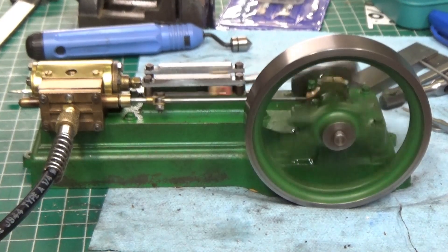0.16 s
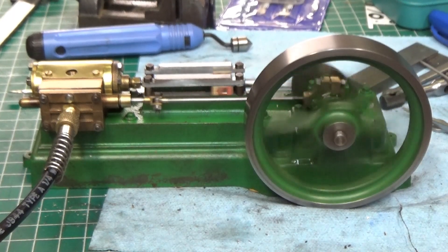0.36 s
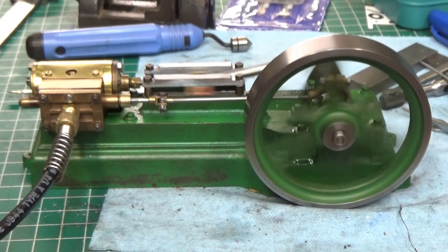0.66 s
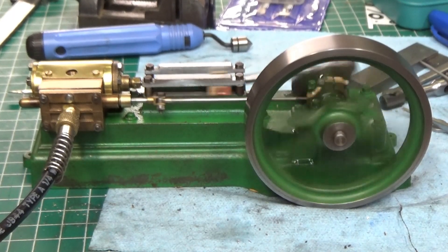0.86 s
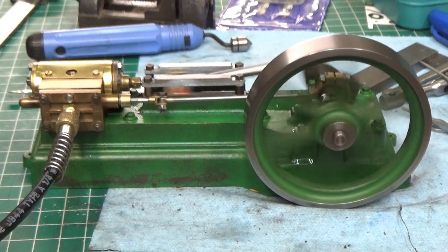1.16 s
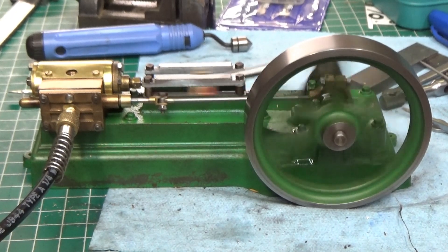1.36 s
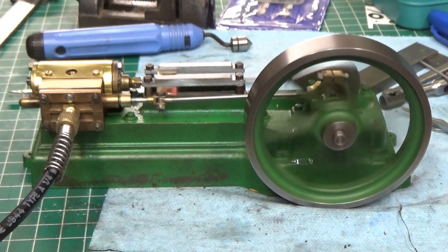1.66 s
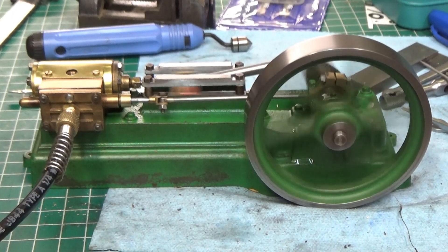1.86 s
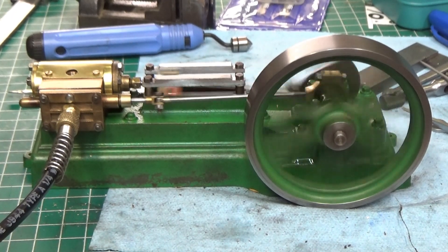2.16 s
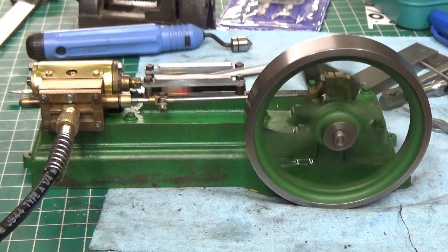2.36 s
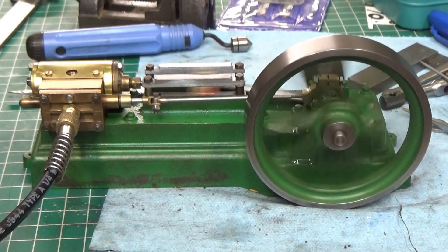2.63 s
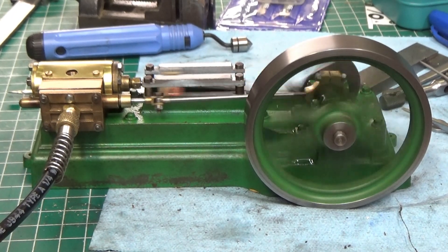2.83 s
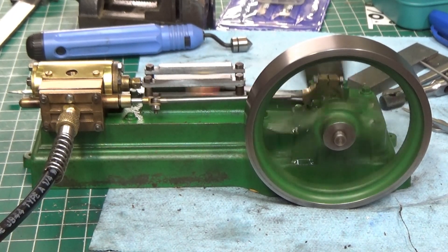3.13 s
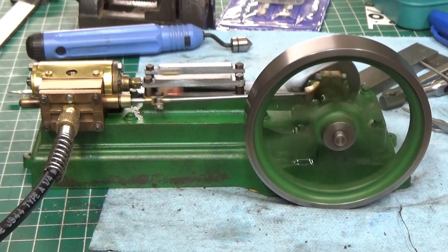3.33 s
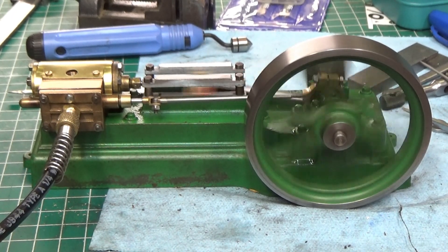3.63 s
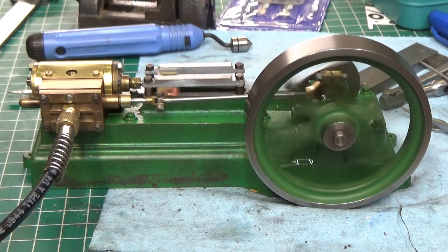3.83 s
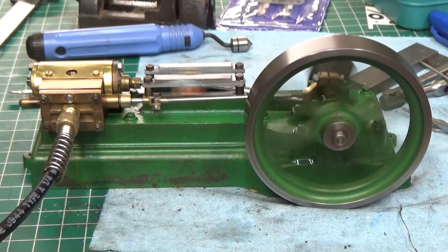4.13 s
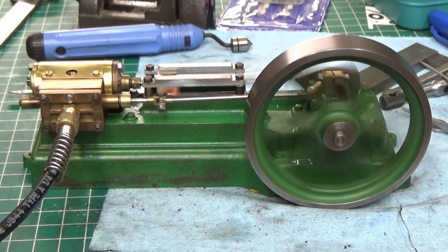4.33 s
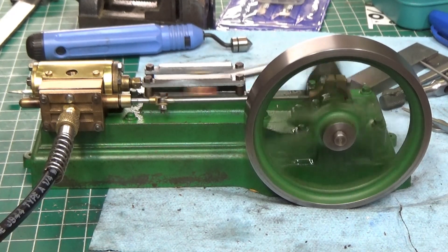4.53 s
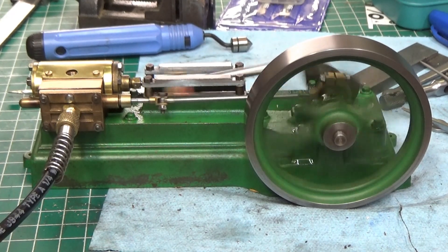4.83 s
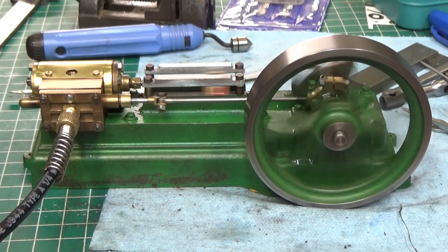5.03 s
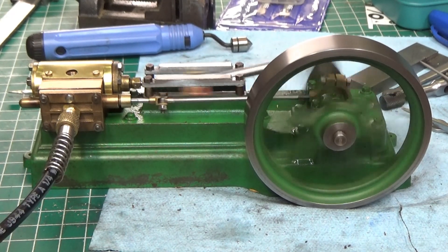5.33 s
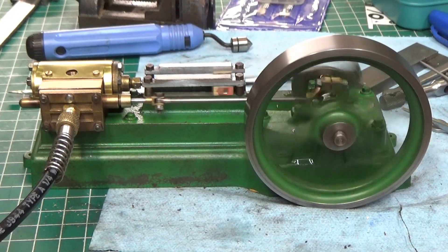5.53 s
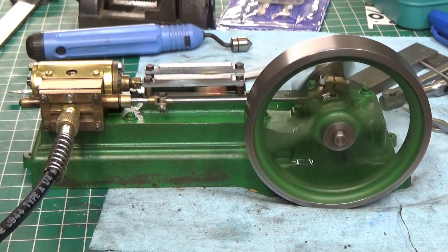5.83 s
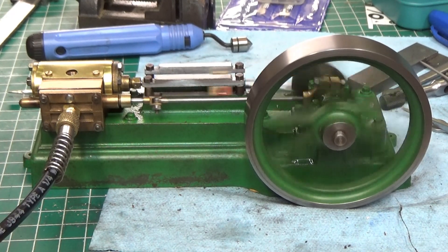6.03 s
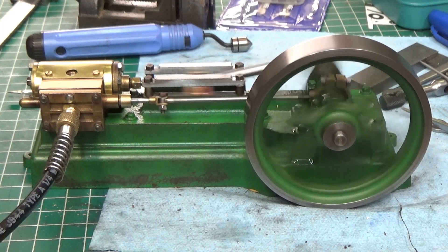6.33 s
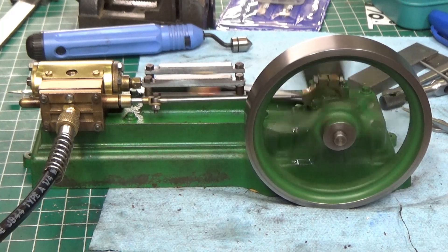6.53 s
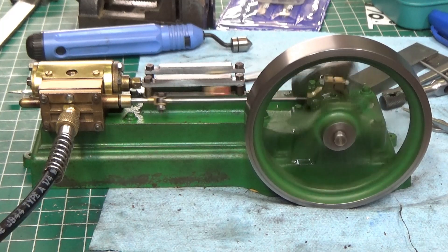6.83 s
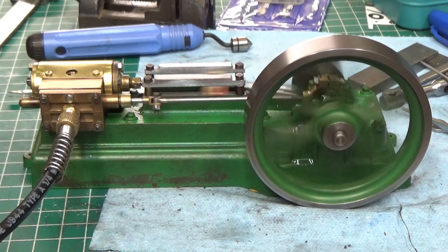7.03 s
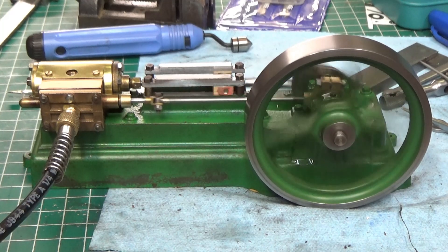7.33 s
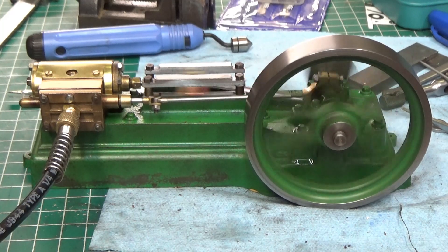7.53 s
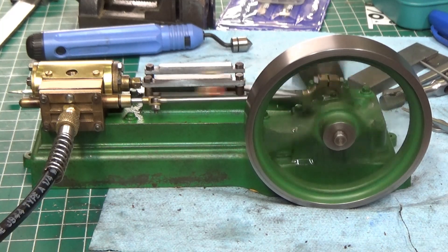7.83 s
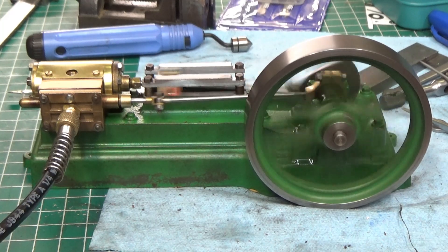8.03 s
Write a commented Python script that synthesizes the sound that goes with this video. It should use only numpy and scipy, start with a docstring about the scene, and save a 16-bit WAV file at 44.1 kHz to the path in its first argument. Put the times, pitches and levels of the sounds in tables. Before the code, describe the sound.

A small air-driven model steam engine chuffs fast and evenly with sharp hisses and light ticks, over a distant compressor's whine.

```python
"""A small horizontal model steam engine runs on compressed air on a workbench, close to a stereo pair.
From the first moment an air compressor whines further off, and something clunks twice on the bench.
Each turn lets out a sharp spit and two long hisses, with a weaker spit between them; the rod ticks at
both dead centres, the crosshead rumbles and a limiter rides on the hiss. Over eight seconds the
flywheel slowly gains speed, from about five and a half turns a second to just over six."""
import sys
import numpy as np
from scipy import signal
from scipy.fft import rfft, irfft, next_fast_len
from scipy.io import wavfile
from scipy.ndimage import uniform_filter1d

SR = 44100
rng = np.random.default_rng(int(sys.argv[2]) if len(sys.argv) > 2 else 0)


def unload_wav(signal):
    """Save mono or channel-first audio to the path in sys.argv[1] as 16-bit WAV at rate SR, clipped to [-1, 1]."""
    wavfile.write(
        sys.argv[1],
        SR,
        np.round(np.clip(np.atleast_2d(signal).T, -1, 1) * 32767).astype(np.int16),
    )


N = 361179
TIME = np.arange(N) / SR
FFT_SIZE = next_fast_len(N + SR)
FREQS = np.maximum(np.fft.rfftfreq(FFT_SIZE, 1 / SR), 1)


def from_db(db):
    """Decibels to gain."""
    return 10 ** (np.asarray(db) / 20)


def unit_rms(x):
    """Scale to unit power."""
    return x / np.sqrt(np.mean(x ** 2) + 1e-20)


def colour(points):
    """Gain at every frequency from (freq_hz, level_db) points."""
    hz, db = np.transpose(points)
    return from_db(np.interp(np.log(FREQS), np.log(hz), db))


def humps(rows):
    """Gain at every frequency from (centre_hz, width_hz, level_db) resonances."""
    return sum(from_db(db) * np.exp(-2 * ((FREQS - hz) / width) ** 2) for hz, width, db in rows)


def shaped(x, gain):
    """Filter by a gain per frequency."""
    return irfft(rfft(x, FFT_SIZE) * gain, FFT_SIZE)[..., :N]


def noise(gain):
    """Noise of the given colour, rms 1."""
    return unit_rms(shaped(rng.standard_normal(FFT_SIZE), gain))


def drift(rate_hz):
    """A random wander of rms 1, changing about rate_hz times a second."""
    knots = rng.standard_normal(8192)
    return unit_rms(np.interp(TIME * rate_hz, np.arange(len(knots)), knots))


def strikes(times, db, spread_db):
    """Clicks at the given times, their strength scattered by spread_db."""
    clicks = np.zeros(N)
    gains = from_db(db + spread_db * rng.standard_normal(len(times)))
    inside = (times >= 0) & (times < TIME[-1])
    clicks[(times[inside] * SR).astype(int)] = gains[inside]
    return clicks


def ring(clicks, hz, t60_s):
    """A unit click sets a sine of height 1 ringing."""
    radius, step = from_db(-60 / (t60_s * SR)), 2 * np.pi * hz / SR
    return signal.lfilter([0, np.sin(step)], [1, -2 * radius * np.cos(step), radius ** 2], clicks + 1e-18)


def thud(clicks, hz, t60_s):
    """A low ring, thinned below its pitch: a bench radiates little deep bass."""
    return signal.sosfilt(signal.butter(2, hz / 2, "high", fs=SR, output="sos"), ring(clicks, hz, t60_s))


# width of the sound at the two microphones: freq_hz, side_to_mid_db
STEREO_WIDTH = [(100, -40), (300, -52), (650, -11), (1300, -5.5), (2200, -21), (4000, -26), (7000, -13),
                (10000, -22.5), (12500, -72), (15000, -55)]
# the distant compressor's weaker tones: shaft_multiple, level_db
COMPRESSOR_TONES = [(3, -71), (4, -71), (5, -69), (7, -68), (10, -59), (13, -62), (17, -60), (21, -64.5),
                    (22, -52.5), (24, -48), (25, -58), (26, -57.5), (27, -59), (29, -60), (31, -61.5),
                    (32, -63.5), (33, -60), (34, -62), (36, -48.5), (37, -56.5), (39, -54.5), (41, -56.5),
                    (44, -53.5), (45, -46), (49, -51.5), (50, -57.5), (52, -61), (54, -74), (57, -64),
                    (58, -59.5), (59, -53), (66, -56.5), (71, -56)]
# rush of the compressor and the room: freq_hz, level_db
COMPRESSOR_RUSH = [(20, -32), (60, -17), (150, -14), (420, -12), (600, -8.5), (700, -0.5), (830, -9.5),
                   (1060, -2), (1230, -5), (1370, 1.5), (1520, -3.5), (1720, -1.5), (2300, -13),
                   (5000, -29)]


def compressor(shaft_hz=29.319, whine_multiple=47, whine_db=-35.0, tones_db=0.5, rush_db=-39):
    """Further off: shaft harmonics over throbbing air; the whine sags and swells with each compression."""
    angle = 2 * np.pi * np.cumsum(shaft_hz * (1 + 0.000485 * drift(4))) / SR
    throb = 1 + 0.24 * np.sin(angle)
    mic_phase = np.array([[0.19], [-0.19]])   # tones reach the two microphones slightly out of step
    whine = from_db(whine_db) * throb * np.sin(whine_multiple * angle + 0.96 * np.cos(angle) + mic_phase)
    circle, one_turn = np.linspace(0, 2 * np.pi, 4096), 0
    for multiple, db in COMPRESSOR_TONES:
        phase = 2 * np.pi * rng.random() + mic_phase * min(multiple / 22, 1) * rng.standard_normal()
        one_turn = one_turn + from_db(db) * np.sin(multiple * circle + phase)
    tones = np.array([np.interp(angle % (2 * np.pi), circle, channel) for channel in one_turn])
    mid = noise(colour(COMPRESSOR_RUSH))
    side = shaped(noise(colour(COMPRESSOR_RUSH)), colour(STEREO_WIDTH))
    rush = np.array([mid + side, mid - side]) * throb
    return np.sqrt(2) * (whine + from_db(tones_db) * tones) + from_db(rush_db) * rush


# reflections off the bench and things near the microphones: delay_s, level_db
BENCH_ECHOES = [(.00256, -19.5), (.00836, -17), (0.016, -14)]


def workshop(sound, tail_t60_s=0.13, tail_db=-15, side_decay_s=0.06):
    """Near reflections and a short diffuse tail; the two microphones hear slightly different mixes."""
    t = TIME[:SR // 2]
    tail = rng.standard_normal(len(t)) * from_db(-60 * t / tail_t60_s) * (t > 0.003)
    echoes = sum(from_db(db) * np.exp(-2j * np.pi * FREQS * delay_s) for delay_s, db in BENCH_ECHOES)
    mid = 1 + echoes + from_db(tail_db) * rfft(tail / np.linalg.norm(tail), FFT_SIZE)
    side_tail = rng.standard_normal(len(t)) * np.exp(-t / side_decay_s)
    side = rfft(side_tail / np.linalg.norm(side_tail), FFT_SIZE) * colour(STEREO_WIDTH)
    return shaped(sound, np.array([mid + side, mid - side]))


# contacts on the bench, bunched into two clunks: start_s, contact_db, thud_db
CLUNK_CONTACTS = [(0.102, -15, -55), (.107, -17, -46), (0.124, -14, -53), (.146, -22, -60),
                  (0.177, -17.5, -58), (.368, -17, -39), (.381, -14, -31), (.391, -19, -45)]
# what the struck bench rings with: pitch_hz, level_db, t60_s
BENCH_MODES = [(342, -14, 0.072), (470, -14, 0.054), (665, -5, 0.1), (900, -7, 0.042), (1108, -2, 0.075),
               (1210, -2, 0.048), (1590, -13, 0.044), (1840, 0.5, .06), (2080, 0.5, 0.044),
               (2310, -1, 0.042), (2600, -5, 0.045)]


def clunks(ring_db=-15.0, scuff_db=-10.5, scuff_decay_s=0.019, scuff_rise_s=0.0023):
    """Nearby, each contact rings the bench and scuffs briefly; the heavy ones thud."""
    times, contact_db, thud_db = np.transpose(CLUNK_CONTACTS)
    rings = sum((-1) ** k * ring(strikes(times, contact_db + db, spread_db=4), hz, t60_s)
                for k, (hz, db, t60_s) in enumerate(BENCH_MODES))
    contacts = strikes(times, contact_db, spread_db=0)
    fading = signal.lfilter([1], [1, -np.exp(-1 / (scuff_decay_s * SR))], contacts + 1e-18)
    scuff_colour = colour([(80, -31), (250, 0), (800, -2.5), (1200, -2), (2600, 2.5), (3600, -5.5)])
    scuff = uniform_filter1d(fading, int(scuff_rise_s * SR) + 1) * noise(scuff_colour)
    thuds = thud(strikes(times, thud_db, spread_db=0), hz=205, t60_s=0.078)
    return from_db(ring_db) * rings + from_db(scuff_db) * scuff + thuds


# the flywheel gathers speed: time_s, turns_per_s
FLYWHEEL_SPEED = [(0.0, 5.446), (0.25, 5.493), (0.5, 5.742), (1.45, 5.733), (2.65, 5.996), (3.4, 6.019),
                  (4.45, 6.192), (6.0, 6.211), (6.6, 6.264), (8.19, 6.312)]


def flywheel(start_turns=0.6532):
    """Speed at every moment, and the crank's position in turns past the first dead centre."""
    speed = np.interp(TIME, *np.transpose(FLYWHEEL_SPEED))
    return speed, start_turns + np.cumsum(speed) / SR


# the crosshead rubs once going out and twice coming back: middle_turns, half_length_turns, level_db
GUIDE_RUBS = [(.16, .06, -57), (.62, 0.11, -46.5), (.87, 0.086, -47.5)]
# rumble of the bench under the engine: freq_hz, level_db
BENCH_RUMBLE = [(60, -18), (150, -14), (200, -8), (245, 2), (275, -0.5), (310, -12.5), (450, -17.5),
                (900, -29)]


def crosshead(turns, speed, sliding_db=-55.0, db_per_turn_per_s=3.5, repeating=0.7, guide_points=7200):
    """Friction rumbles the bench, more with speed; the guide's roughness comes round every turn."""
    friction_power = from_db(sliding_db) ** 2
    for middle, half_length, db in GUIDE_RUBS:
        from_middle = (turns - middle + 0.5) % 1 - 0.5
        friction_power += (from_db(db) * np.exp(-(from_middle / half_length) ** 2)) ** 2
    guide = rng.standard_normal(guide_points)[(turns % 1 * guide_points).astype(int)]
    roughness = repeating * guide + (1 - repeating) * rng.standard_normal(N)
    rumble = unit_rms(shaped(roughness, colour(BENCH_RUMBLE)))
    return from_db(db_per_turn_per_s * (speed - speed.mean())) * np.sqrt(friction_power) * rumble


def passing(turns, position):
    """The times at which the crank passes one position in its turn."""
    marks = np.arange(np.ceil(turns[0] - position), turns[-1] - position) + position
    return np.interp(marks, turns, TIME)


# play in the rod, taken up at the dead centres: position_turns, tick_db, thump_db
DEAD_CENTRE_KNOCKS = [(.043, -34, -53), (.474, -29.5, -44.5)]
# ring of the rod and bed casting: pitch_hz, level_db, t60_s
ROD_MODES = [(1814, -7, 0.022), (1950, 0.5, 0.023), (2060, -7.5, 0.03), (2755, -4, 0.042)]


def rod(turns, thump_lead_turns=0.061):
    """The load reverses twice a turn: the bed thumps softly, then the bearing closes with a tick."""
    knocks = np.zeros(N)
    for position, tick_db, thump_db in DEAD_CENTRE_KNOCKS:
        tick_times, thump_times = passing(turns, position), passing(turns, position - thump_lead_turns)
        knocks += thud(strikes(thump_times, thump_db, spread_db=1.5), hz=115, t60_s=0.034)
        for hz, db, t60_s in ROD_MODES:
            knocks += ring(strikes(tick_times, tick_db + db, spread_db=1.3), hz, t60_s)
    return knocks


# hiss at the gland: centre_hz, width_hz, level_db
LEAK_BANDS = [(2640, 1070, -13.5), (4164, 660, 0), (9750, 2950, -3.5)]


def gland_leak(level_db=-30.5):
    """Air leaks steadily past the gland, a thin hiss under the puffs."""
    return from_db(level_db) * noise(humps(LEAK_BANDS))


# the port cracks open near each dead centre: start_turns, level_db
PORT_OPENINGS = [(-.014, -15.5), (.41, -25.5)]
# resonances of the exhaust's mouth: centre_hz, width_hz, level_db
MOUTH_BANDS = [(4400, 930, 1), (5430, 1800, 0)]


def port_spit(turns, rise_turns=0.0097, decay_turns=0.029):
    """The port cracks open with a sharp spit that fades within milliseconds."""
    bursts = np.zeros(N)
    for start, db in PORT_OPENINGS:
        since = (turns - start) % 1
        bursts += from_db(db) * np.minimum(since / rise_turns, np.exp((rise_turns - since) / decay_turns))
    return bursts * noise(humps(MOUTH_BANDS))


def puff(turns, start, rise, hold, fall, db, swell_db_per_turn):
    """A port opens, stays open and shuts, while the pressure behind it builds or drains."""
    since = (turns - start) % 1
    opening = np.clip(np.minimum(since / rise, (rise + hold + fall - since) / fall), 0, 1)
    return opening * from_db(db + swell_db_per_turn * since)


# the exhaust jet, heard close up: freq_hz, level_db
JET_SPECTRUM = [(300, -40), (1000, -26.5), (2000, -20.5), (3400, -12.5), (4050, -5.5), (5200, -4),
                (6100, -6.5), (7200, -2.5), (9000, -1.5), (10300, -1), (11700, -0.5), (12700, -6.5),
                (14400, -12.5), (15700, -23.5)]
# resonances and dips of the exhaust passage: centre_hz, width_hz, gain_db
EXHAUST_PASSAGE = [(2690, 284, 5.5), (3050, 110, -4), (4050, 170, 3.5), (4440, 500, 3), (7550, 190, 7.5),
                   (7950, 840, -11.5), (8950, 300, 1), (11350, 260, 2), (13250, 300, -7)]
# the puffs of one turn (short blast, swelling hiss, fading hiss, faint blow-by):
# start_turns, rise_turns, hold_turns, fall_turns, level_db, swell_db_per_turn, tilt_db_per_octave
VALVE_PUFFS = [(-.025, .042, .015, 0.078, -12, -17, 2.6), (0.084, 0.12, .19, 0.027, -20.5, 15.5, 1),
               (.425, 0.019, 0.32, 0.075, -12, -37.5, 1.7), (.87, 0.039, 0.043, .1, -27.5, 2, 1.5)]


def exhaust(turns, flutter_db=0.5, turbulence_db=0.72, pivot_hz=8500, seep_db=-27, seep_tilt_db=-1.5):
    """In front: the slide valve meters a jet in puffs, each with its own brightness; the passage rings."""
    passage_db = sum(db * np.exp(-2 * ((FREQS - hz) / width) ** 2) for hz, width, db in EXHAUST_PASSAGE)
    jet = noise(colour(JET_SPECTRUM) * from_db(passage_db)) * from_db(flutter_db * drift(300))
    flows = [(puff(turns, *shape), tilt_db) for *shape, tilt_db in VALVE_PUFFS]
    flows.append((from_db(seep_db), seep_tilt_db))   # air slips past the valve all the time
    octaves = np.log2(np.geomspace(3500, 14000, 4) / pivot_hz)
    hiss = np.zeros(N)
    for octave, band_weights in zip(octaves, np.eye(len(octaves))):
        band = shaped(jet, np.interp(np.log2(FREQS / pivot_hz), octaves, band_weights))
        flow = np.sqrt(sum((gain * from_db(tilt_db * octave)) ** 2 for gain, tilt_db in flows))
        hiss += band * flow * from_db(turbulence_db * drift(60))   # turbulence shifts the colour
    return hiss


def scene(balance_db=0.06):
    """Engine and clunks on the bench in front of the microphones, the compressor behind."""
    speed, turns = flywheel()
    air = exhaust(turns) + port_spit(turns) + gland_leak()
    bench = workshop(air + rod(turns) + clunks()) * from_db([[-balance_db], [balance_db]])
    return bench + crosshead(turns, speed) + compressor()


def record(dry, threshold_db=-16.0, squeeze=0.95, release_db_per_s=160, ahead_s=0.0029, cutoff_hz=15720):
    """After the microphones, a quick limiter ducks everything under the loud hisses; the top is cut."""
    level_db = 10 * np.log10(uniform_filter1d(np.mean(dry ** 2, axis=0), size=220) + 1e-12)
    over_db = np.maximum(level_db - threshold_db, 0)
    release_db = release_db_per_s * TIME
    held_db = np.maximum.accumulate(over_db + release_db) - release_db
    duck_db = squeeze * np.interp(TIME + ahead_s, TIME, uniform_filter1d(held_db, size=88))
    lowpass = signal.ellip(12, 0.1, 90, cutoff_hz, fs=SR, output="sos")
    return signal.sosfilt(lowpass, dry * from_db(-duck_db))


dry = scene()
out = record(dry)
unload_wav(out)
```